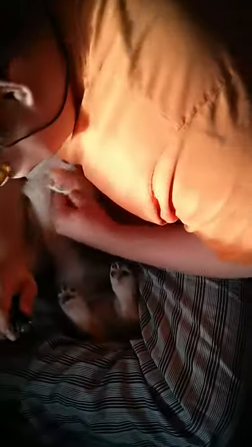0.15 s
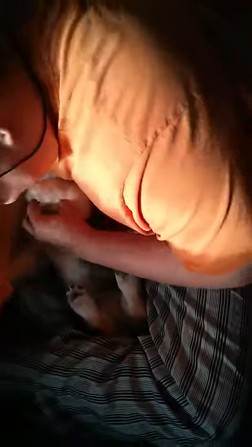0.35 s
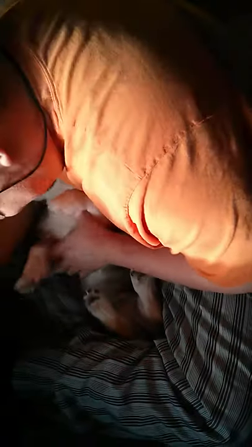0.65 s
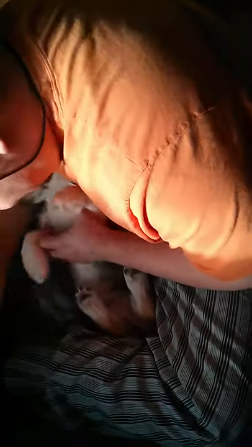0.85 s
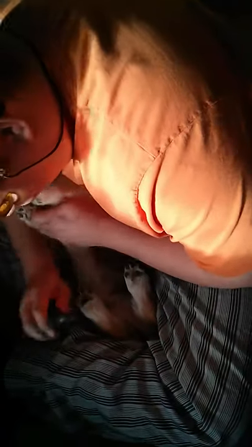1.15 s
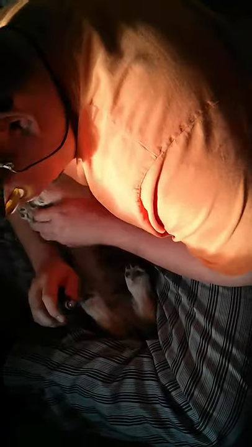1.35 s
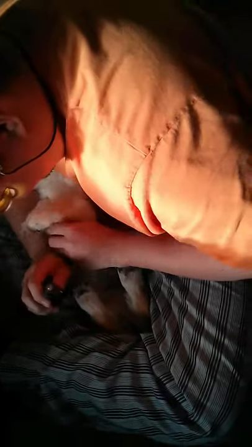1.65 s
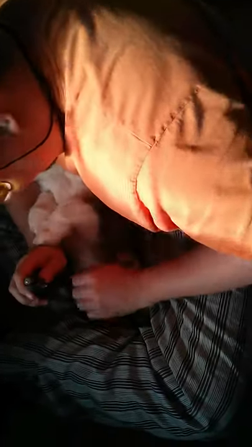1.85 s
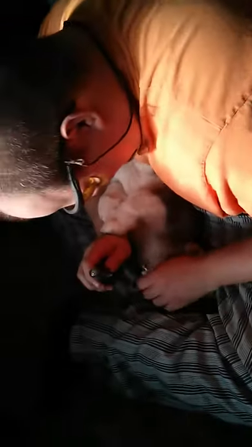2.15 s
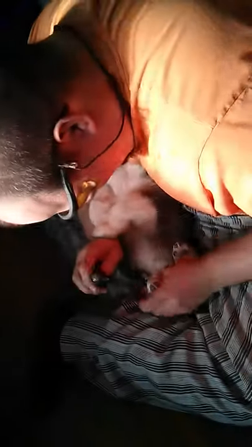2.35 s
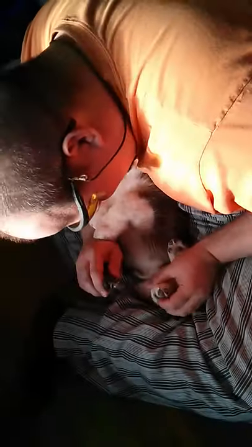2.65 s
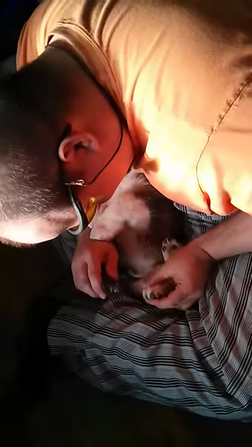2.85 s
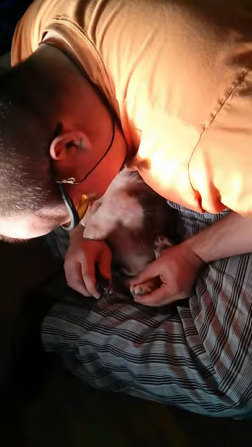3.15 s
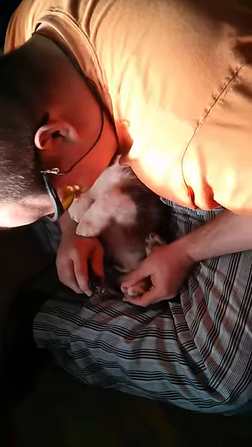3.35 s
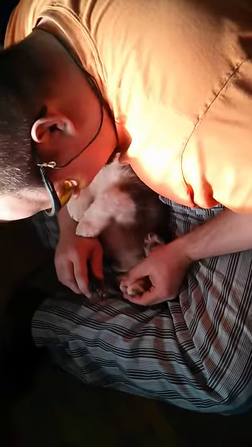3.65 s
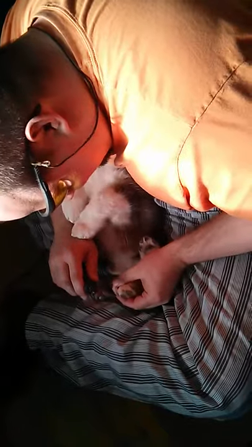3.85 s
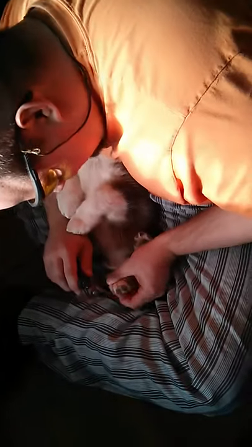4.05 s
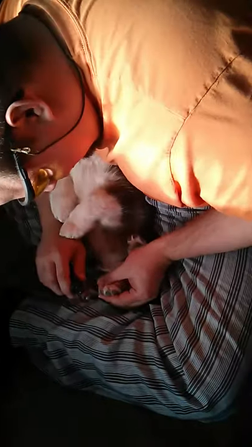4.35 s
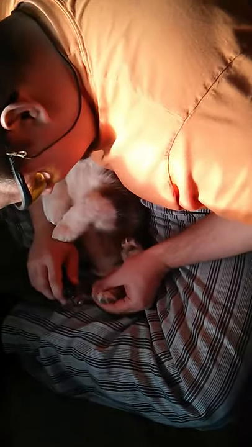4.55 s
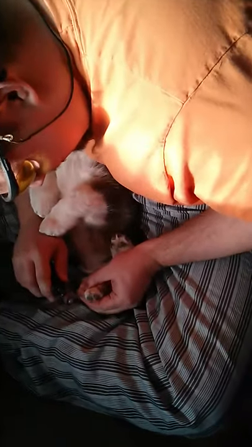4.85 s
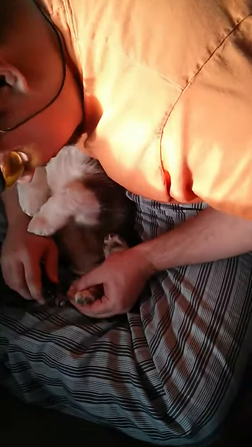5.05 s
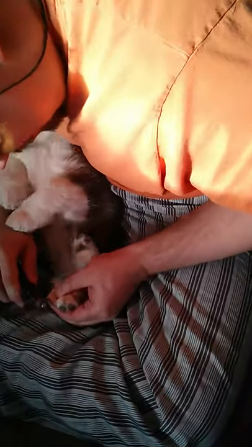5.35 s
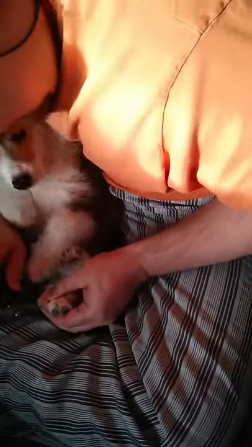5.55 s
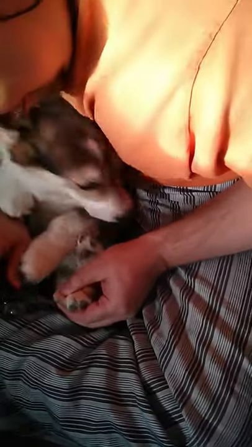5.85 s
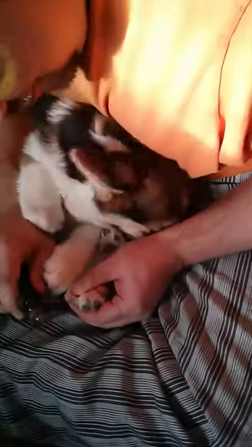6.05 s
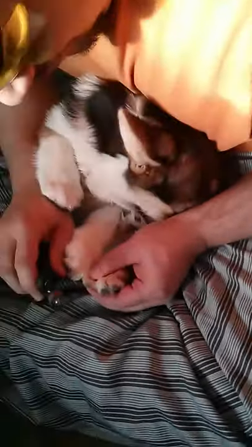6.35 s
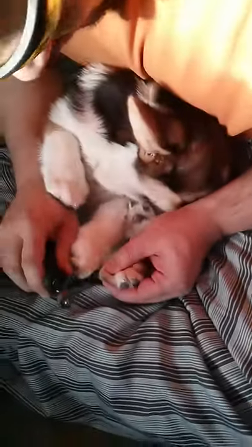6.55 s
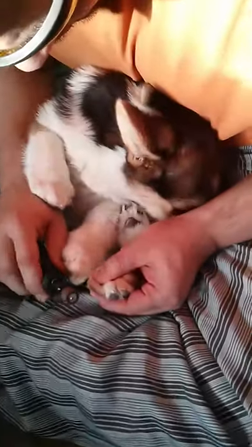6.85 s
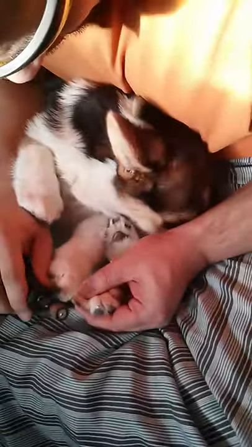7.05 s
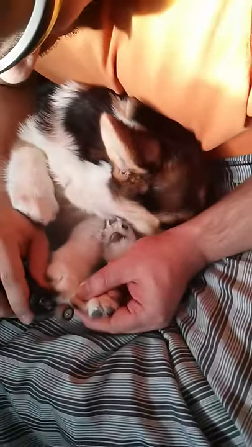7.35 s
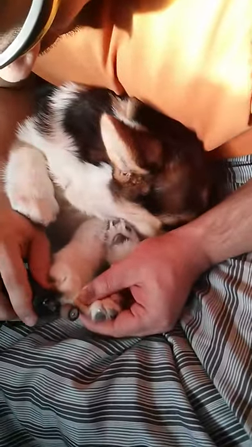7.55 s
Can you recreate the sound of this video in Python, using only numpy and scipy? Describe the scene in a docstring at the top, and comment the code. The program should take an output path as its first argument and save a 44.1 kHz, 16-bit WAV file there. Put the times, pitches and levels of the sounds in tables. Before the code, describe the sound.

A small handheld nail grinder runs close by with a piercing, wavering whine over a bright hiss and light buzz.

```python
"""On a lap, close by, a small handheld nail grinder runs while a puppy's paw is held ready.
Its shaft hums at about 485 turns a second. Tones at whole multiples of that speed are called orders:
order 18 is a piercing whine, heard over the hiss of the motor's sliding brushes.
Friction makes the plastic case buzz, and a soft low rush lies underneath.
The whine and the low orders swell and fade as the hand turns the tool."""
import sys
import numpy as np
from scipy import signal
from scipy.fft import rfft, irfft
from scipy.io import wavfile
from scipy.ndimage import uniform_filter1d, minimum_filter1d, map_coordinates

SR = 44100
rng = np.random.default_rng(int(sys.argv[2]) if len(sys.argv) > 2 else 0)


def wrap_up_sound(samples):
    """Save the sound to the file named by the first command line argument, as 16-bit audio."""
    columns = np.atleast_2d(samples).T
    # keep every value between -1 and 1, then stretch to whole-number steps
    tamed = np.clip(columns, -1, 1)
    steps = np.round(tamed * 32767).astype(np.int16)
    wavfile.write(sys.argv[1], SR, steps)


N = 339997
T = np.arange(N) / SR
FREQS = np.maximum(np.fft.rfftfreq(N, 1 / SR), 1)

# How strong the whine is. Each row: time in seconds, level in dB.
WHINE_LEVEL = [(0, -18), (.27, -27), (.38, -2), (.47, -32), (.54, -23), (.6, -38), (.73, -12.5), (.8, -36),
               (.95, -33), (1.12, -9), (1.2, -16), (1.29, -4.5), (1.58, -23.5), (1.72, -28), (1.8, -15.5),
               (1.94, -36), (2.0, -11.5), (2.2, -37), (2.34, -20), (2.47, -43), (2.64, -25), (2.73, -10),
               (3.5, -12), (3.9, -7.5), (4.08, -11), (4.51, -13.5), (4.74, -8.5), (4.93, -9.5), (5.3, -40),
               (5.45, -20), (5.55, -12), (5.65, -20), (6.1, -8), (6.43, -8), (6.53, -21), (6.65, -10),
               (7.71, -8.5)]
# How strong the brush hiss is. Each row: time in seconds, level in dB.
HISS_LEVEL = [(0, -17.5), (.28, -15), (.39, -14), (.9, -17), (1.37, -16), (1.72, -21), (2.02, -15),
              (2.38, -20), (2.51, -23.5), (2.8, -17), (3.9, -16), (4.55, -16.5), (4.89, -14.5), (5.3, -20),
              (5.58, -16.5), (6.23, -14), (7.71, -15)]
# How the rush and the low case buzz swell. Each row: time in seconds, boost in dB.
LOW_BOOST = [(0, -2), (.9, -1.5), (2.5, -1.5), (3.1, 1), (4.5, 1), (5.3, 2.5), (5.85, 1.5), (6.15, 5.5),
             (7.1, 9), (7.71, 6)]


def undb(db):
    """Turn decibels into a number to multiply by."""
    return 10 ** (np.asarray(db) / 20)


def curves(table):
    """Join rows that start with a time by straight lines: one curve for each further column."""
    times, *columns = np.transpose(table)
    return [np.interp(T, times, column) for column in columns]


def unit(x):
    """Scale a signal so that its average strength (rms) is 1."""
    return x / np.sqrt(np.mean(np.abs(x) ** 2))


def walk(rate):
    """A smooth random curve of strength 1 that swings up to about rate times a second."""
    points = rng.standard_normal(size=4096)
    return unit(map_coordinates(points, [2 * rate * T], order=3, mode="wrap"))


def sway(spread_db, rate):
    """The drifting loudness of a part that turns toward and away from us as the hand moves."""
    return undb(spread_db * walk(rate))


def colour(x, points):
    """Filter x by a curve of (Hz, dB) points, then scale it to strength 1."""
    hz, db = np.transpose(points)
    gain = undb(np.interp(np.log(FREQS), np.log(hz), db, left=-80, right=-80))
    return unit(irfft(rfft(x) * gain, N))


def resonance(hz, width_hz):
    """The filter of a part that rings at one pitch and weakens the others."""
    return 1 / (1 + 1j * hz / width_hz * (FREQS / hz - hz / FREQS))


def shaft(wobble_hz, jitter_hz):
    """The angle of the spinning shaft in radians; friction makes its speed tremble."""
    # Each row: time in seconds, turns per second.
    speed = [(0, 485.1), (.65, 484.3), (.95, 484.9), (1.4, 484.2), (1.65, 484.6), (2.6, 484.2),
             (3.05, 484.2), (4.0, 484.9), (4.45, 484.8), (5.05, 485.2), (5.4, 485.8), (5.9, 486.1),
             (6.55, 486), (7.05, 486.7), (7.3, 486.4), (7.62, 487.3)]
    hz = curves(speed)[0] + wobble_hz * walk(13.4) + jitter_hz * walk(144)
    return 2 * np.pi * np.cumsum(hz) / SR


def tone(angle, order, flutter_db, flutter_rate):
    """One order of the shaft: a pure tone whose loudness flutters."""
    phase = order * angle + rng.uniform(0, 2 * np.pi)
    return np.sqrt(2) * np.sin(phase) * undb(flutter_db * walk(flutter_rate))


def rasp(angle, order, width_hz):
    """A narrow band of noise around one order, which makes it sound rough."""
    return walk(width_hz) * np.sin(order * angle) + walk(width_hz) * np.cos(order * angle)


def friction(angle, swing_db, uneven_db):
    """Parts rub under unsteady pressure, making noise that swells once a turn."""
    return rng.standard_normal(N) * undb(swing_db * np.cos(angle) + uneven_db * walk(31))


def rush(level_db=-51, threshold_db=-12.5, rise=1.72):
    """A soft low rush; it rises whenever the whine is louder than the threshold."""
    # Each row: frequency in Hz, relative level in dB.
    rush_colour = [(20, -6), (100, -3.5), (250, -2.5), (430, 0), (620, -7), (1100, -5), (1700, -4.5),
                   (3500, -64), (7000, -38)]
    surge_db = rise * np.maximum(curves(WHINE_LEVEL)[0] - threshold_db, 0)
    gain = undb(level_db + curves(LOW_BOOST)[0] + surge_db)
    return gain * colour(rng.standard_normal(N), rush_colour)


def case_buzz(angle):
    """Friction in the bearings makes the plastic case ring in six bands that swell and fade."""
    # Each row: pitch in Hz, filter width in Hz, level in dB, how much of its boost it takes.
    bands = [(857, 460, -47, 0.82), (1814, 950, -38, -0.32), (2270, 350, -44, 1.19),
             (2860, 860, -45.5, 0.94), (3850, 760, -48.5, 0.65), (4850, 1230, -43, 0.91)]
    # Swells near 3 kHz (mid) and at 4-5 kHz (high). Each row: time in seconds, boost in dB.
    mid_boost = [(0, 14), (.45, 4), (.7, -8), (1.22, 12.5), (1.65, -1.5), (1.95, -3), (2.38, 8), (2.9, 2),
                 (4.2, -5.5), (5.4, -3), (5.95, 7.5), (6.7, 12.5), (7.71, 10)]
    high_boost = [(0, -3), (.35, 3), (1.1, 2), (1.6, -1), (2.5, -1.5), (4.4, -4), (4.8, 3.5), (5.35, -1),
                  (5.8, 8.5), (6.9, 4), (7.71, 0)]
    boosts = (LOW_BOOST, LOW_BOOST, LOW_BOOST, mid_boost, high_boost, high_boost)
    out = 0
    for (hz, width_hz, db, share), boost in zip(bands, boosts):
        rubbing = friction(angle, swing_db=1.3, uneven_db=2.0)
        ringing = irfft(rfft(rubbing) * resonance(hz, width_hz) ** 2, N)  # filtered twice
        gain = undb(db + share * curves(boost)[0]) * sway(spread_db=1.7, rate=7)
        out += gain * unit(ringing)
    return out


def hum(angle):
    """The off-balance shaft hums cleanly; higher orders shake the case and sound rougher."""
    # One table for each order. Each row: time in seconds, level in dB.
    first = [(0.0, -28), (0.3, -33), (0.52, -55), (0.75, -38), (1.12, -52.5), (1.37, -35.5), (2.02, -34),
             (2.45, -41.5), (2.73, -58), (3.0, -49.5), (4.53, -57.5), (4.76, -43), (5.3, -27), (7.6, -23),
             (7.71, -25)]
    second = [(0, -48.5), (2.1, -48), (2.8, -60), (5.7, -59), (6.4, -45), (7.71, -49)]
    third = [(0.0, -47), (0.17, -43), (0.52, -68), (0.58, -50), (0.9, -30.5), (1.2, -27), (1.55, -49),
             (1.7, -35.5), (2.1, -47), (2.19, -39), (2.94, -38.5), (4.87, -28), (5.41, -33.5), (5.69, -49),
             (6.49, -35), (6.87, -46), (7.11, -39.5), (7.71, -38)]
    fourth = [(0, -24.5), (.19, -45), (.6, -25), (.86, -35), (1.05, -51), (1.19, -30.5), (1.4, -29.5),
              (1.7, -38), (1.8, -26.5), (2.0, -24), (2.3, -30), (2.74, -29.5), (2.84, -43), (3.5, -35.5),
              (4.9, -40), (5.3, -37.5), (5.67, -27.5), (6.0, -52), (6.45, -37), (7.71, -38.5)]
    fifth = [(0, -53), (2.3, -51), (2.48, -47), (2.9, -47), (5.5, -51), (6.15, -39.5), (6.55, -29),
             (7.15, -30.5), (7.71, -36)]
    seventh = [(0, -57), (.28, -41), (.65, -59), (1.17, -48), (2.0, -56.5), (5.5, -57), (5.95, -35.5),
               (6.3, -44.5), (7.71, -43)]
    layers = [
        (first, tone(angle, 1, flutter_db=0.52, flutter_rate=34)),
        (second, tone(angle, 2, flutter_db=3.0, flutter_rate=19)),
        (third, tone(angle, 3, flutter_db=1.24, flutter_rate=22)),
        (fourth, tone(angle, 4, flutter_db=1.8, flutter_rate=44) + undb(-10) * rasp(angle, 4, 110)),
        (fifth, tone(angle, 5, flutter_db=2.5, flutter_rate=40) + undb(-8.5) * rasp(angle, 5, 68)),
        (seventh, tone(angle, 7, flutter_db=3.0, flutter_rate=14) + undb(-6) * rasp(angle, 7, 45)),
    ]
    return sum(undb(curves(level)[0]) * sound for level, sound in layers)


def brushes(angle, hiss_trim_db=-0.98, sheen_trim_db=1.1, air_trim_db=0.5):
    """Brushes scrape the motor's spinning contacts: a bright hiss with faint tones in it."""
    # Three ever higher bands: hiss, sheen, air. Each row: frequency in Hz, relative level in dB.
    hiss_colour = [(4200, -44), (5300, -20), (6000, -12.5), (6600, -3.5), (7200, 1), (7900, 4.5),
                   (8400, 2.5), (8750, 2), (9200, -3.5), (9700, -6), (10500, -18)]
    sheen_colour = [(8800, 6), (9600, -0.5), (10600, -2), (11300, -7), (12200, -25), (13500, -35)]
    air_colour = [(10500, -15), (11900, -5.5), (13000, -5.5), (14700, -3.5), (15700, -4.5)]
    # How much treble is aimed at us. Each row: time in seconds, sheen in dB, air in dB.
    aim = [(0, -28, -34), (.25, -25, -32), (.94, -39, -39.5), (1.14, -25, -32), (1.42, -23, -29),
           (1.7, -28.5, -33.5), (3.13, -20, -29.5), (3.7, -22, -31.5), (4.4, -24, -34.5),
           (5.02, -24.5, -34), (5.26, -30.5, -39), (5.85, -29, -38), (6.2, -23.5, -29.5), (6.78, -21, -28),
           (7.71, -24, -31)]
    # Each row: order, level in dB compared with HISS_LEVEL.
    faint_orders = [(8, -38), (12, -36), (13, -28), (14, -27), (20, -27), (24, -33), (27, -38)]
    sheen_db, air_db = curves(aim)
    hiss = undb(hiss_trim_db) * colour(friction(angle, swing_db=0.1, uneven_db=0.5), hiss_colour)
    tones = sum(undb(db) * tone(angle, order, flutter_db=1.8, flutter_rate=20)
                for order, db in faint_orders)
    sheen = colour(friction(angle, swing_db=3.0, uneven_db=0.53), sheen_colour)
    air = colour(friction(angle, swing_db=0.6, uneven_db=0.2), air_colour)
    scrape = undb(curves(HISS_LEVEL)[0]) * (hiss + tones) + undb(sheen_db + sheen_trim_db) * sheen
    return scrape * sway(spread_db=0.9, rate=12) + undb(air_db + air_trim_db) * air


def side_tones(angle):
    """The motor's contacts are unequal, so weak, rough tones come and go around the whine."""
    # The orders that sound, below and above the whine.
    orders = (9, 11, 15, 16, 17, 19)
    # Each row, one per order: dB compared with HISS_LEVEL, share of LOW_BOOST, drift in dB.
    strengths = [(-41.5, 0, 3), (-42.5, 0.17, 5.5), (-18.5, 0, 2.2), (-11.5, 0.06, 2), (-11.5, 0.3, 2.5),
                 (-17, 0.57, 1)]
    hiss_db, boost_db = curves(HISS_LEVEL)[0], curves(LOW_BOOST)[0]
    out = 0
    for order, (db, share, drift_db) in zip(orders, strengths):
        pure = tone(angle, order, flutter_db=1.3, flutter_rate=14)
        rough = undb(-6) * rasp(angle, order, width_hz=30)
        gain = undb(hiss_db + db + share * boost_db) * sway(drift_db, rate=4)
        out += gain * (pure + rough)
    return out


def whine(angle, order=18, firm_db=-11, loose_db=-24, flutter_db=2.0, stutter_db=3, slip_radians=0.65):
    """The piercing tone: pure while strong, stuttering when weak, over a rasp that follows the hiss."""
    level_db = curves(WHINE_LEVEL)[0]
    looseness = np.clip((firm_db - level_db) / (firm_db - loose_db), 0.12, 1)
    phase = order * angle + slip_radians * looseness * walk(35)
    tremble_db = looseness * (flutter_db * walk(27) + stutter_db * walk(7))
    pure = np.sqrt(2) * np.sin(phase) * undb(level_db + tremble_db)
    rough = undb(curves(HISS_LEVEL)[0] - 12) * rasp(angle, order, width_hz=52)
    return pure + rough


def reflection(x, share=0.7, centre_hz=3250, width_hz=1150, delay_s=0.002994):
    """A nearby surface bounces the middle pitches back a moment late, so they sound hollow."""
    strength = share * np.exp(-((FREQS - centre_hz) / width_hz) ** 4)
    echo = strength * np.exp(-2j * np.pi * FREQS * delay_s)
    response = (1 + echo) / np.sqrt(1 + strength ** 2)  # keeps the overall loudness
    return irfft(rfft(x) * response, N)


def scene():
    """One shaft drives every part of the tool; both channels carry the same sound."""
    angle = shaft(wobble_hz=0.1, jitter_hz=0.22)
    tool = whine(angle) + side_tones(angle) + brushes(angle) + hum(angle) + case_buzz(angle)
    return np.tile(reflection(tool + rush()), (2, 1))


def record(dry):
    """A fast limiter smoothly turns the loudest peaks down, and the highest treble is cut."""
    ceiling, sharpness, top_hz = 0.8, 10, 15780
    peak = np.abs(dry).max(axis=0)
    needed_gain = (1 + (peak / ceiling) ** sharpness) ** (-1 / sharpness)
    gain = uniform_filter1d(minimum_filter1d(needed_gain, size=60), size=60)
    treble_cut = signal.ellip(12, 0.05, 60, top_hz, fs=SR, output="sos")
    return signal.sosfiltfilt(treble_cut, dry * gain)


dry = scene()
out = record(dry)
wrap_up_sound(out)
```